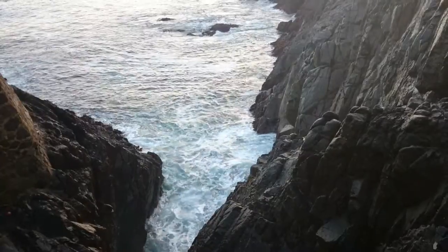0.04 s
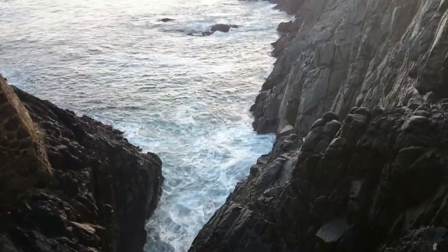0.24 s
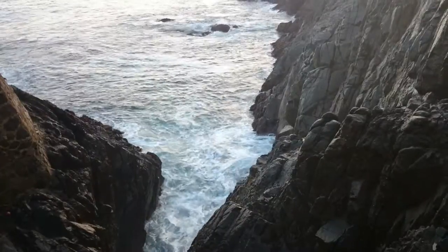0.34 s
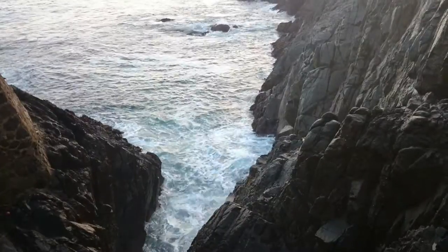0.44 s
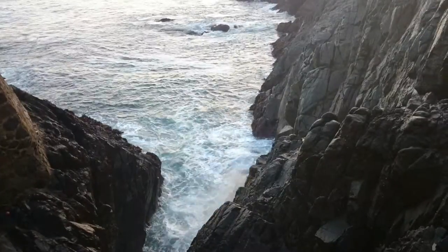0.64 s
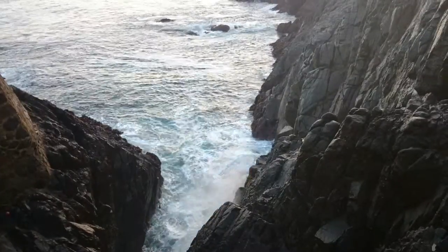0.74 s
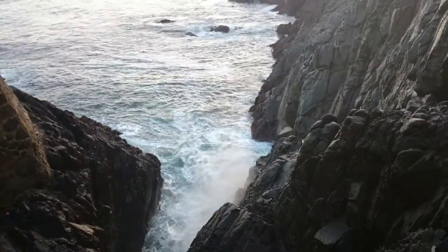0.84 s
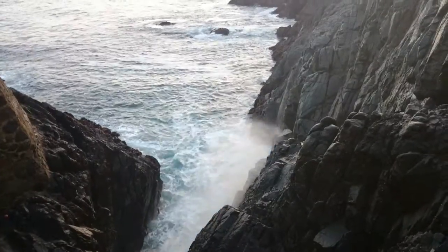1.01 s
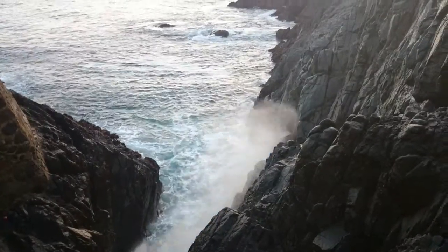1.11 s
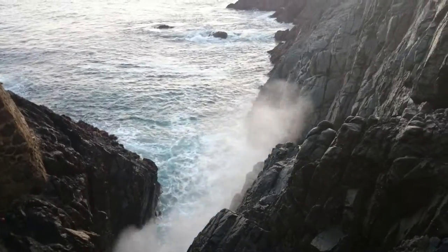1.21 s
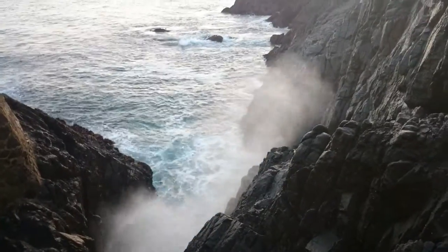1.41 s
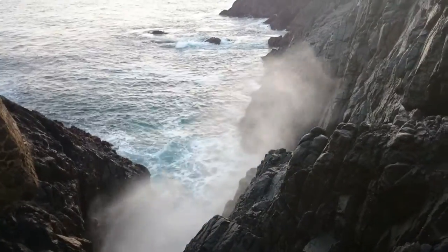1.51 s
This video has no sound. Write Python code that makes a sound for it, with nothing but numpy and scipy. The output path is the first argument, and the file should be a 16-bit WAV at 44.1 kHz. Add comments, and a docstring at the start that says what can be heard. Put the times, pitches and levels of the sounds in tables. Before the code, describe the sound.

Sea water surges through a narrow rocky cleft, heard from the rocks above. From the start, churning, bubbling foam roars and swells under a bright hiss of spray. A gust builds with it, buffeting the microphone with a low rumble, and both peak near 1 second. The wind drops away by about 1.4 seconds and the foam subsides, while the spray hisses on to about 1.5 seconds.

```python
"""Sea water surges through a narrow rocky cleft, heard from the rocks above.
Churning foam roars and swells, throwing off a hiss of spray.
A gust rises with the surge and buffets the microphone with a low rumble; both peak near 1 s.
The gust drops away, the foam subsides, and the spray hisses on a little longer."""
import sys
import numpy as np
from scipy import signal
from scipy.fft import rfft, irfft
from scipy.io import wavfile
from scipy.ndimage import uniform_filter1d

SR = 44100
rng = np.random.default_rng(int(sys.argv[2]) if len(sys.argv) > 2 else 0)


def wrap_up_sound(samples):
    """Save the sound to the file named by the first command line argument, as 16-bit audio."""
    columns = np.atleast_2d(samples).T
    # keep every value between -1 and 1, then stretch to whole-number steps
    tamed = np.clip(columns, -1, 1)
    steps = np.round(tamed * 32767).astype(np.int16)
    wavfile.write(sys.argv[1], SR, steps)


N = 68355


def from_db(db):
    """Decibels to gain."""
    return 10 ** (np.asarray(db) / 20)


def unit_rms(x):
    """Scale to rms 1."""
    return x / np.sqrt(np.mean(x ** 2) + 1e-20)


def per_sample(rows):
    """Each column of a time table at every sample."""
    t_s, *columns = np.transpose(rows)
    return [np.interp(np.arange(N) / SR, t_s, column) for column in columns]


def per_bin(rows):
    """Each column of a frequency table at every spectral bin."""
    f_hz, *columns = np.transpose(rows)
    bins_hz = np.maximum(np.arange(N // 2 + 1) * SR / N, 1)
    return np.array([np.interp(np.log(bins_hz), np.log(f_hz), column) for column in columns])


def coloured(x, colour):
    """Shape a flat source, falling 60 dB/decade beyond the table's ends; rms 1."""
    (low_hz, low_db), (high_hz, high_db) = colour[0], colour[-1]
    skirted = [(low_hz / 10, low_db - 60), *colour, (high_hz * 10, high_db - 60)]
    return unit_rms(irfft(rfft(x) * from_db(per_bin(skirted)[0]), N))


def drift(rate_hz):
    """Slow random wander, rms about 1."""
    hop, settle = 40, 2000
    pole = np.exp(-2 * np.pi * rate_hz * hop / SR)
    noise = rng.standard_normal(N // hop + settle + 2)
    slow = signal.lfilter([1], [1, -2 * pole, pole * pole], noise)[settle:]
    return np.interp(np.arange(N) / hop, np.arange(len(slow)), unit_rms(slow))


def grains(per_s, spread_db):
    """Random clicks of either sign, a few larger than the rest."""
    sizes = from_db(spread_db * np.minimum(rng.exponential(1, N), 4))
    signs = rng.choice([-1, 1], N)
    return sizes * signs * (rng.random(N) < per_s / SR)


def ring(clicks, f_hz, t60_s):
    """Each click starts a damped sine."""
    radius = np.exp(-np.log(1000) / (t60_s * SR))
    angle = 2 * np.pi * f_hz / SR
    return signal.lfilter([0, np.sin(angle)], [1, -2 * radius * np.cos(angle), radius ** 2], clicks + 1e-18)


def widen(pair):
    """Spread two unrelated signals across the cleft: alike in the bass, diffuse in the treble."""
    # water sound, left against right: f/Hz, correlation
    water_likeness = [(100, .95), (600, 0.79), (1100, 0.39), (1550, .15), (1900, 0.51), (2600, 0.068),
                      (4500, -0.19), (5900, -0.16), (7500, .05), (15000, 0.056)]
    correlation = np.clip(per_bin(water_likeness)[0], -0.99, 0.99)
    mid, side = rfft(pair)
    return irfft(np.sqrt(1 + correlation) * mid + np.sqrt(1 - correlation) * side * [[1], [-1]], N)


def wind():
    """A gust's deep rumble and the flutter of small eddies, nearly the same at both microphone ports."""
    # envelopes: t/s, level/dB
    gust_envelope = [(0.0, -46), (0.034, -54), (0.236, -34), (0.262, -39.5), (0.474, -34), (0.504, -29.5),
                     (0.534, -34), (0.604, -26), (0.646, -29.5), (0.798, -22), (0.85, -29.5), (0.922, -24),
                     (0.948, -27.5), (0.988, -20), (1.014, -26), (1.056, -24.5), (1.074, -30.5),
                     (1.256, -36.5), (1.376, -53), (1.55, -54)]
    flutter_envelope = [(0.0, -51.5), (0.556, -30.5), (0.992, -30), (1.368, -45.5), (1.536, -58.5),
                        (1.55, -72)]
    # spectra: f/Hz, level/dB
    rumble_colour = [(28, -32), (47, -19), (58, -3), (82, -2), (110, -3), (160, -10.5), (250, -24.5),
                     (500, -36)]
    flutter_colour = [(70, -27), (150, -1.5), (200, -2), (290, 0), (420, -4), (750, -10), (1100, -21.5),
                      (2200, -38)]
    steady_s, left_lag_s = 0.04, 0.00097
    (gust_db,), (flutter_db,) = per_sample(gust_envelope), per_sample(flutter_envelope)
    rumble = coloured(rng.standard_normal(N), rumble_colour)
    local_power = uniform_filter1d(rumble ** 2, int(steady_s * SR))
    steadied = unit_rms(rumble / np.sqrt(local_power + 0.12))  # holds the rumble to its envelope
    right = steadied * from_db(gust_db + 0.5)
    t_s = np.arange(N) / SR
    left = np.interp(t_s - left_lag_s, t_s, right)
    eddies = coloured(grains(per_s=2000, spread_db=1), flutter_colour)
    return np.array([left, right]) + eddies * from_db(flutter_db - 1.33)


def spray(spray_db, mist_db):
    """Countless droplets merge into a hiss; fine mist hisses higher."""
    # spectra: f/Hz, level/dB
    spray_colour = [(2000, -12), (4000, -8), (5300, 2.5), (7000, -1.5), (8500, -5.5), (10000, -13),
                    (13000, -24)]
    mist_colour = [(7000, -20), (10000, -2), (11500, 0), (13000, 0.5), (16000, -1)]
    hiss = np.zeros((2, N))
    for colour, level_db in (spray_colour, spray_db - 2), (mist_colour, mist_db - 0.5):
        drops = np.array([grains(per_s=30000, spread_db=2.5) for side in range(2)])
        hiss += from_db(level_db) * widen(coloured(drops, colour))
    return hiss


def bubbles(per_s=3000, sizes=24, t60_cycles=7):
    """Dense short rings of bubbles of many sizes; rms 1."""
    rings = np.zeros(N)
    for nominal_hz in np.geomspace(520, 4000, sizes):
        onsets = grains(per_s / sizes, spread_db=3.5)
        rings += ring(onsets, nominal_hz * rng.uniform(0.9, 1.05), t60_cycles / nominal_hz)
    return unit_rms(rings)


def foam():
    """Churning white water: a flickering wash with bubbles in it."""
    # wash spectrum: f/Hz, level/dB
    wash_colour = [(35, -10), (65, -1.5), (250, 6), (680, 6.5), (1000, 1), (1400, 0.5), (1900, 2),
                   (2600, -0.9), (4200, -5), (7000, -15.5)]
    wash = coloured(rng.standard_normal((2, N)), wash_colour)
    churn_db = 0.5 * drift(rate_hz=15)
    bubbling = np.array([bubbles(), bubbles()])
    return widen(from_db(2 + churn_db) * wash + from_db(-10) * bubbling)


def scene():
    """Foam, spray and lingering mist swell with the surge, under the gust."""
    # surge envelopes: t/s, foam level/dB, spray level/dB, mist level/dB
    surge = [(0.0, -47.5, -48, -57), (0.042, -48.5, -46.5, -58), (0.172, -46.5, -45, -55.5),
             (0.538, -41, -39, -51), (0.94, -40, -38.5, -48), (1.104, -44, -41, -50.5),
             (1.186, -45, -41, -48), (1.342, -47.5, -44, -52), (1.38, -46.5, -44, -52.5),
             (1.55, -49, -44.5, -55)]
    foam_db, spray_db, mist_db = per_sample(surge)
    return spray(spray_db, mist_db) + from_db(foam_db) * foam() + wind()


def record(dry, cutoff_hz=15850):
    """Each microphone port colours its side; the top is cut steeply."""
    # port response: f/Hz, left level/dB, right level/dB
    ports = [(80, -2.5, 2.5), (300, -1.54, 0.7), (740, -3, 1.36), (1180, -1.5, 3.2), (1820, 0, 1),
             (2320, -2.8, 1), (3860, 3, 3.5), (4940, 1.5, 1.5), (5470, -1, 8.8), (5940, 0.8, 5),
             (6440, -1.5, 3.5), (7370, -1, -2.5), (8740, 1, -3), (10120, 0.5, -5), (11360, 9, -0.5),
             (13000, 0, 0), (14300, -3, 3), (15600, -7, 6)]
    f_hz = np.arange(N // 2 + 1) * SR / N
    lowpass = 1 / np.sqrt(1 + (f_hz / cutoff_hz) ** 400)
    return irfft(rfft(dry) * from_db(per_bin(ports)) * lowpass, N)


dry = scene()
out = record(dry)
wrap_up_sound(out)
```